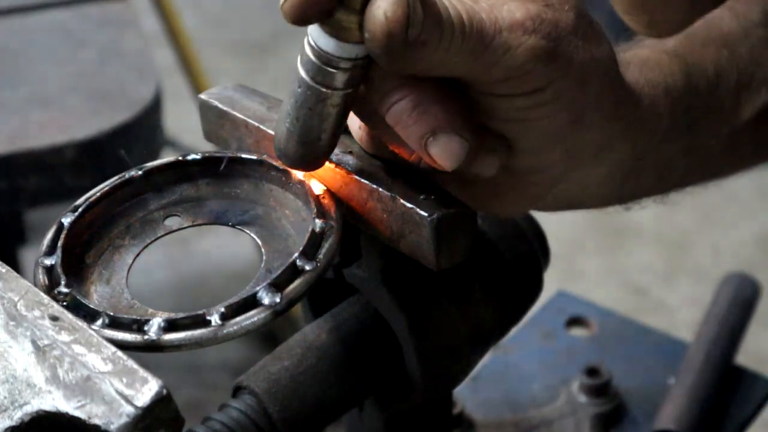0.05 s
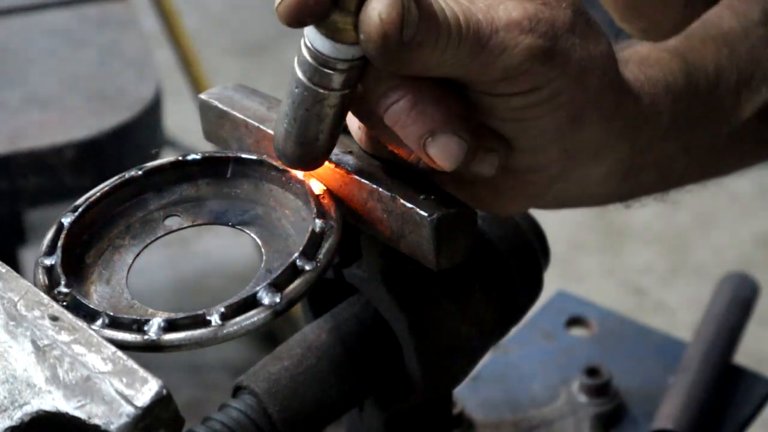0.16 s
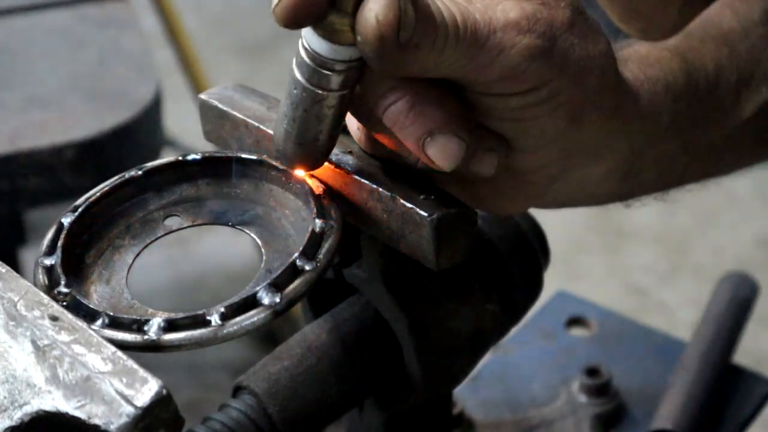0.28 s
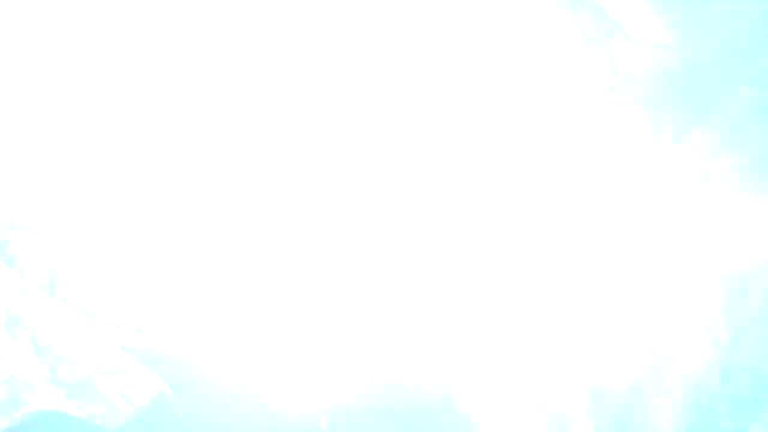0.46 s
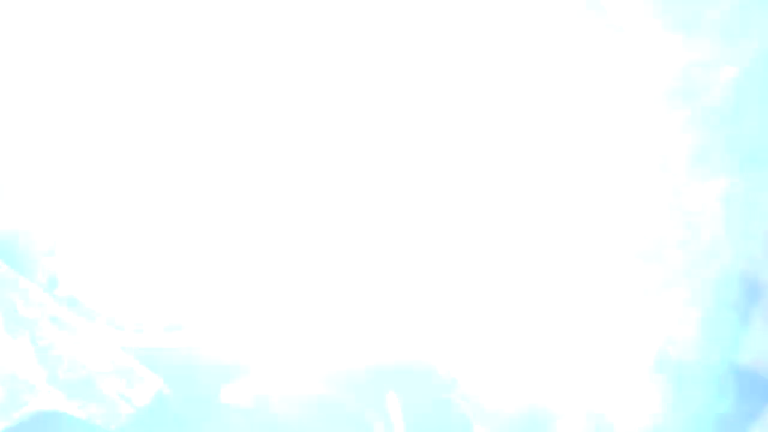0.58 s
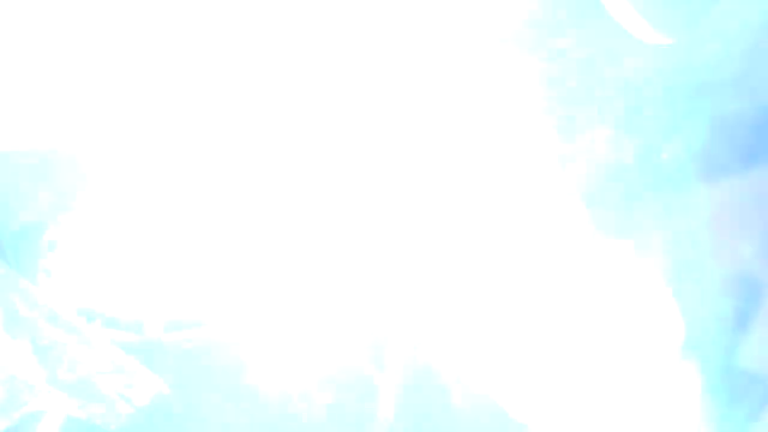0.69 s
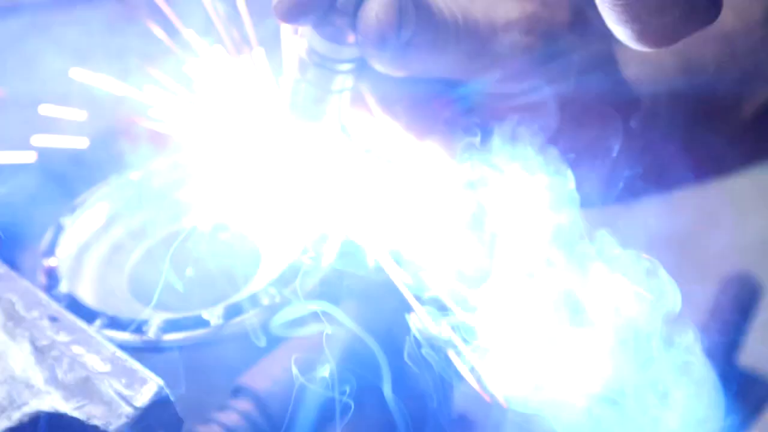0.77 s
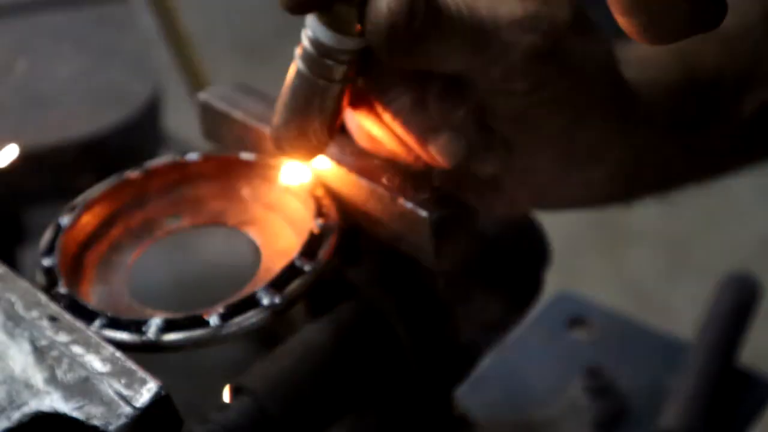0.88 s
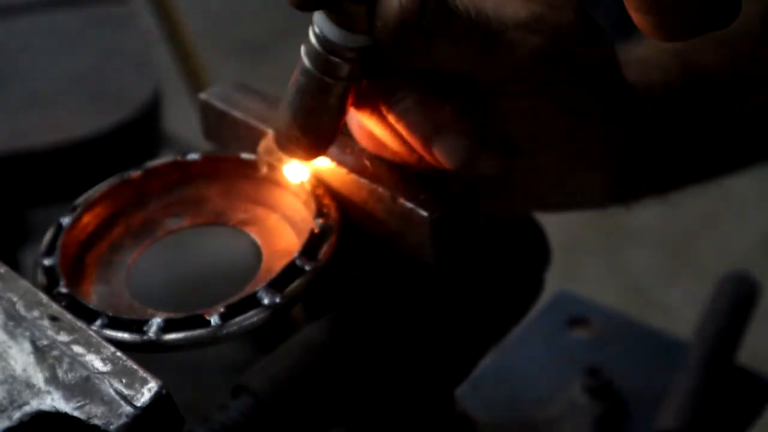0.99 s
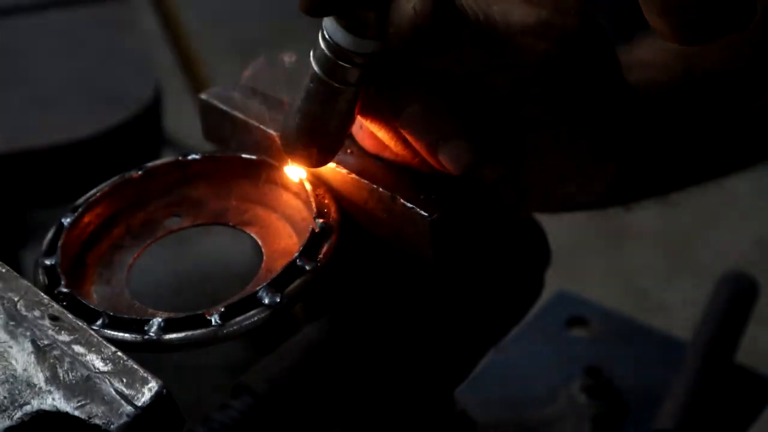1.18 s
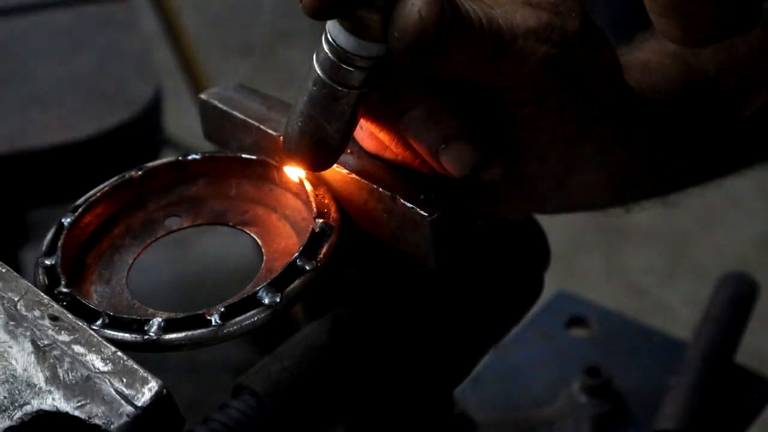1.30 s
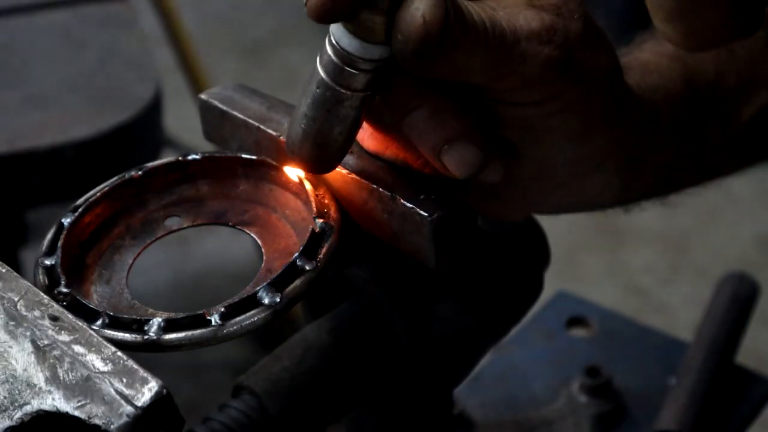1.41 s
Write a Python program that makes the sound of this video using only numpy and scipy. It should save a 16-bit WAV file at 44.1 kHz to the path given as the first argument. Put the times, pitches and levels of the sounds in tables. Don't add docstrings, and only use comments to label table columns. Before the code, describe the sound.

A wire-feed welder snaps once, then crackles in a rapid sputtering burst over low workshop hum

```python
import sys
import numpy as np
from scipy import signal
from scipy.fft import rfft, irfft, next_fast_len
from scipy.io import wavfile
from scipy.ndimage import map_coordinates

SR = 44100
rng = np.random.default_rng(int(sys.argv[2]) if len(sys.argv) > 2 else 0)


def wrap_up_sound(samples):
    columns = np.atleast_2d(samples).T
    tamed = np.clip(columns, -1, 1)
    steps = np.round(tamed * 32767).astype(np.int16)
    wavfile.write(sys.argv[1], SR, steps)


def convert_level_to_amplitude(level_db):
    exponent = np.asarray(level_db, float) / 20
    return 10 ** exponent


N = 63945

# (time [s], gain [dB])
CAMERA_GAIN = [
    (0, 3),
    (.03, 0.5),
    (.34, 1),
    (.37, -11.5),
    (.8, -7.5),
    (.835, -21.5),
    (.9, -7.5),
    (1.15, -7.5),
    (1.35, -5.5),
    (1.45, -4.5),
]
# (frequency [Hz], density [dB per Hz])
RUMBLE_SPECTRUM = [(25, -13), (120, -11.5), (400, -6), (900, -8), (2400, -12.5), (3400, -23), (9000, -36),
                   (15000, -57)]
# (frequency [Hz], width [Hz], level [dB])
HUM_BANDS = [(163.2, 16.4, 1), (264, 9.2, 1.5), (299.3, 8.3, -4), (380, 12.6, -5.5), (508.5, 21, -8),
             (860, 12.6, -9), (1018, 12.7, -6.5)]
# (frequency [Hz], density [dB per Hz])
MIC_SPECTRUM = [(3000, -36), (4500, 10.5), (7000, -3), (12500, -5), (15000, -16)]
# (frequency [Hz], correlation [-1 to 1])
SHOP_CORRELATION = [(60, 0.9), (200, 1), (700, 0.71), (1500, 0.12), (4400, -0.64), (12000, -0.59)]

# (time [s], whistle level [dB])
WHISTLE_LEVEL = [(0, -48), (.21, -52), (.221, -33), (.225, -29), (.274, -15.5), (.347, -14), (.356, -48),
                 (.39, -42), (.412, -30), (.46, -22), (.506, -16.5), (.514, -31), (.56, -56), (.6, -90),
                 (1.45, -97)]
# (frequency [Hz], width [Hz], level [dB])
NOZZLE_MODES = [(1764, 510, 3.5), (5355, 870, 0), (9000, 2700, -5), (11070, 600, -6.5)]
# (frequency [Hz], correlation [-1 to 1])
WHISTLE_CORRELATION = [(1300, 0.92), (5300, 0.83), (8000, 0.044), (14000, -0.56)]
# (time [s], hiss level [dB])
STREAM_LEVEL = [(0, -33), (.213, -34), (.235, -31.5), (.28, -29.5), (.35, -23), (.375, -26.5), (.5, -25),
                (.56, -27), (.59, -37), (.66, -30.5), (.79, -33.5), (.82, -35), (.86, -57), (1.45, -90)]
# (frequency [Hz], density [dB per Hz])
STREAM_SPECTRUM = [(500, -15), (900, -4.5), (1450, -4.5), (2600, -3.5), (3400, -6.5), (8500, -5.5),
                   (12500, -2.5), (15500, -21.5)]
# (time [s], hiss level [dB])
PURGE_LEVEL = [
    (0, -78),
    (.8, -90),
    (.83, -40),
    (.87, -35.5),
    (.9, -27.5),
    (.96, -33.5),
    (1.04, -42),
    (1.12, -52),
    (1.25, -63),
    (1.45, -86),
]
# (frequency [Hz], density [dB per Hz])
PURGE_SPECTRUM = [(600, -21), (1100, -6), (2000, -8), (3400, -3), (8500, -3.5), (11500, -5.5), (13000, -15),
                  (15500, -42)]
# (frequency [Hz], width [Hz], level [dB])
RING_CAVITY = [(1460, 160, 4), (2450, 300, 2)]
# (frequency [Hz], correlation [-1 to 1])
GAS_CORRELATION = [(700, 0.22), (1300, 0.24), (2400, -0.2), (4400, -0.63), (12000, -0.49)]

# (time [s], snap level [dB], push of hot gas [full scale], suction after it [full scale],
# spread of the push at the far port [0 to 1])
RESTRIKES = [(0.3438, -7, 0.072, 0.059, 0.1), (0.3487, 3, 1.8, 0.62, .5), (0.3515, -11.5, 0.47, 0.09, 0),
             (0.5073, -5, 0.35, 0.029, 0.08), (0.5108, 0, 1.1, 0, 0.18), (.527, -7.5, 0.042, 0.87, 0.1),
             (0.5344, -4, 0.84, 0, 0.19), (0.5419, -15, 0.11, 0.46, 0), (0.5495, -10, 0.59, .1, 0),
             (.5566, -26, 0.033, 0, 0), (0.5673, -9, 0.41, 0.088, 0.42), (0.6107, -4, 0.96, 0.23, 0.54),
             (0.6433, -7.5, 0.56, 0.28, 0.6), (0.6621, -9, .75, 0.17, 0.95), (0.6812, -8, 0.53, 0.08, 0.6),
             (0.7085, -5.5, 0.54, 0, 0.73), (.7293, -20, 0.036, 0.11, 0), (0.7595, -6, 0.83, 0.29, 0.5),
             (.7797, -13, 0.46, .05, 0.65), (0.8032, -12, 0.024, 0.27, 0)]
# (frequency [Hz], width [Hz], level [dB])
CRACK_BANDS = [(2300, 2400, 0), (7300, 2000, -12)]
# (time [s], sizzle level [dB])
BURN_LEVEL = [(0, -90), (.509, -70), (.515, -36), (.527, -14), (.531, -30), (.545, -29), (.567, -20.5),
              (.585, -25), (.605, -25), (.8, -27.5), (.815, -66), (1.45, -88)]
# (frequency [Hz], width [Hz], level [dB])
SIZZLE_BANDS = [(11800, 1200, -11), (7140, 18000, -14), (14500, 1800, -8.5)]
# (frequency [Hz], correlation [-1 to 1])
SIZZLE_CORRELATION = [(3000, 0.12), (11000, 0.16), (15000, .2)]
# (frequency [Hz], 60 dB decay time [s])
WALL_DECAY = [(200, 0.076), (2000, 0.067), (10000, .1)]


def unit(x):
    return x / np.sqrt(np.mean(x ** 2) + 1e-20)


def along(points, hz):
    f, value = np.transpose(points)
    return np.interp(np.log(hz + 1), np.log(f + 1), value)


def spectrum(points):
    return lambda hz: convert_level_to_amplitude(along(points, hz))


def level(rows):
    s, db = np.transpose(rows)
    return convert_level_to_amplitude(np.interp(np.arange(N) / SR, s, db))


def wobble(rate):
    knots = rng.standard_normal(int(N * rate / SR) + 4)
    return map_coordinates(knots, [np.arange(N) * rate / SR])


def filtered(x, response):
    m = next_fast_len(N + SR // 2)
    return irfft(rfft(x, m) * response(np.fft.rfftfreq(m, 1 / SR)), m)[..., :N]


def resonant(peaks):
    def response(f):
        total = 0
        for k, (centre, width, db) in enumerate(peaks):
            damping = 1j * f * width
            total = total + (-1) ** k * convert_level_to_amplitude(db) * damping / (centre * centre - f * f + damping)
        return total
    return response


def rush(response, correlation):
    def mid_side(hz):
        angle = np.arccos(np.clip(along(correlation, hz), -1, 1)) / 2
        return response(hz) * [np.cos(angle), np.sin(angle)]

    mid, side = filtered(rng.standard_normal((2, N)), mid_side)
    return unit(np.array([mid + side, mid - side]))


def shop():
    rumble = convert_level_to_amplitude(-38 + 0.67 * wobble(25.1)) * rush(spectrum(RUMBLE_SPECTRUM), SHOP_CORRELATION)
    hum_response = lambda hz: resonant(HUM_BANDS)(hz) * hz / (hz + 150)
    hum = convert_level_to_amplitude(-38 + 0.53 * wobble(13.8)) * rush(hum_response, SHOP_CORRELATION)
    mic_hiss = convert_level_to_amplitude(-55.5) * rush(spectrum(MIC_SPECTRUM), SHOP_CORRELATION)
    return level(CAMERA_GAIN) * (rumble + hum) + mic_hiss


def nozzle_whistle():
    def modes(hz):
        return sum(resonant([(c, w, db / 2)])(hz) ** 2 for c, w, db in NOZZLE_MODES)

    return level(WHISTLE_LEVEL) * convert_level_to_amplitude(1.17 * wobble(178)) * rush(modes, WHISTLE_CORRELATION)


def gas_hiss():
    stream_noise = rush(spectrum(STREAM_SPECTRUM), GAS_CORRELATION)
    stream = level(STREAM_LEVEL) * convert_level_to_amplitude(2.3 * wobble(59)) * stream_noise
    over_ring = lambda hz: spectrum(PURGE_SPECTRUM)(hz) * (1 + abs(resonant(RING_CAVITY)(hz)))
    purge = level(PURGE_LEVEL) * convert_level_to_amplitude(0.73 * wobble(60.7)) * rush(over_ring, GAS_CORRELATION)
    return stream + purge


def gas():
    valve_s = .2095
    whistle = nozzle_whistle() * convert_level_to_amplitude([[.3], [-.3]])
    hiss = gas_hiss() * convert_level_to_amplitude([[.4], [-.4]])
    return (whistle + hiss) * (np.arange(N) / SR > valve_s)


def hump(t, lag, rise):
    u = np.maximum(t - lag, 0) / rise
    return u * np.exp(1 - u)


def restrikes():
    snap_s, short_s = .00011, .0027
    push_s, suction_s, suction_lag_s = 0.00027, 0.001, 0.00065
    spread_lag_s, spread_loss_db = .0003, 5.5
    out = np.zeros((2, N))
    t = np.arange(SR // 20) / SR
    grit = unit(filtered(rng.standard_normal((2, N)), resonant(CRACK_BANDS)))
    ping = convert_level_to_amplitude(-60 * t / .005) * np.sin(2 * np.pi * 11400 * t + [[0], [2.6]]) * convert_level_to_amplitude([[-.6], [.6]])

    def crack(start):
        burst = convert_level_to_amplitude(-5 - 60 * t / .006) * grit[:, start:start + len(t)]
        return (ping + burst) * (1 - np.exp(-t / .00015))

    for s, db, push, suction, spread in RESTRIKES:
        far = np.array([[0], [spread]])
        snap = np.sign(suction - push) * np.exp(-((t - 2 * snap_s) / snap_s) ** 2)
        pulse = hump(t, 3 * snap_s + spread_lag_s * far, push_s * (1 + 1.33 * far))
        blast = push * convert_level_to_amplitude(-spread_loss_db * far) * pulse
        rebound = suction * hump(t, suction_lag_s, suction_s)
        i = round((s - 2 * snap_s) * SR)
        out[:, i:i + len(t)] += convert_level_to_amplitude(db + 1) * crack(i) + convert_level_to_amplitude(db) * snap + blast - rebound
        j = round((s - short_s) * SR)
        tick = crack(j) - hump(t, 0, snap_s) + 0.23 * hump(t, 3 * snap_s, 2 * snap_s)
        out[:, j:j + len(t)] += convert_level_to_amplitude(db - 13) * tick
    return out


def sizzle():
    build_s = .009
    build, last = np.zeros(N), 0
    clock = np.arange(N) / SR
    for s, db, *_ in RESTRIKES:
        growth = np.exp(np.minimum(clock - s, 0) / build_s)
        build += convert_level_to_amplitude(db) * growth * (clock < s) * (clock > last)
        last = s + 0.009
    noise = rush(resonant(SIZZLE_BANDS), SIZZLE_CORRELATION)
    return convert_level_to_amplitude(2.5 * wobble(300)) * level(BURN_LEVEL) * (0.25 + build) * noise


def arc():
    return restrikes() + sizzle()


def walls(x):
    hz, t, z = signal.stft(rng.standard_normal((2, SR // 3)), SR, nperseg=256)
    decay = convert_level_to_amplitude(-60 * t / along(WALL_DECAY, hz)[:, None])
    tail = signal.istft(z * decay, SR, nperseg=256)[1]
    delayed = np.pad(x, (200, 0))
    return signal.fftconvolve(delayed[None], tail / np.linalg.norm(tail[0]), axes=1)[:, :N]


def scene():
    lag_s = -.0001
    shop_noise = shop() * convert_level_to_amplitude([[.4], [-.4]])
    gas_noise = gas()
    blasts = arc()
    direct = filtered(blasts, lambda hz: np.exp(np.outer([-1, 1], 1j * np.pi * hz * lag_s)))
    return direct + convert_level_to_amplitude(-17.5) * walls(blasts.mean(0)) + gas_noise + shop_noise


def low_pass(x):
    return signal.sosfilt(signal.butter(12, 15690, fs=SR, output="sos"), x)


def record(dry):
    cut_hz, cut_damping, roll_hz, full_scale = 47.4, 1.78, 15900, 0.95

    def microphone(f):
        low_cut = -f * f / (cut_hz ** 2 - f * f + 1j * f * cut_hz * cut_damping)
        return low_cut / (1 + (f / roll_hz) ** 6)

    x = filtered(dry, microphone)
    mix = x / (1 + np.abs(x / full_scale) ** 8) ** (1 / 8)
    return low_pass(mix)


dry = scene()
out = record(dry)
wrap_up_sound(out)
```